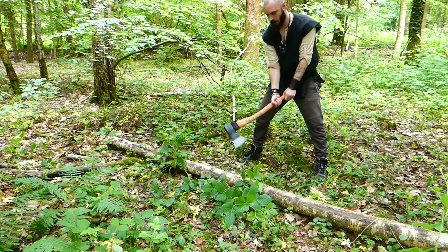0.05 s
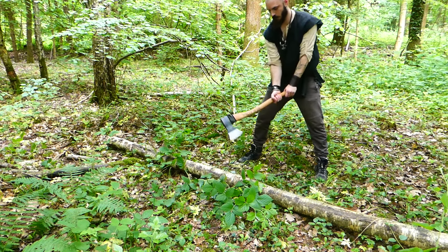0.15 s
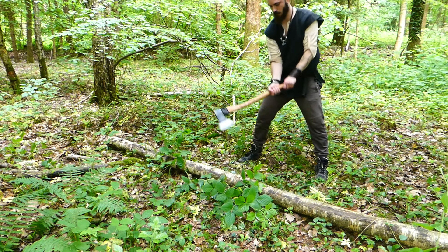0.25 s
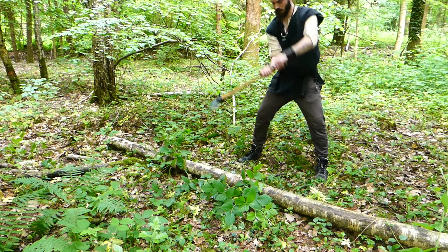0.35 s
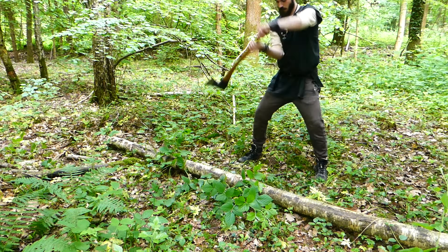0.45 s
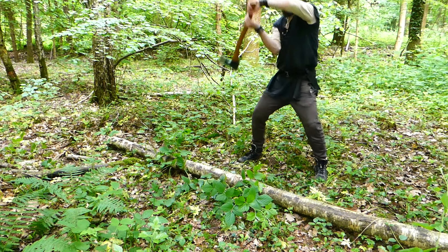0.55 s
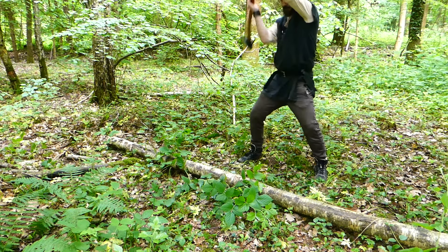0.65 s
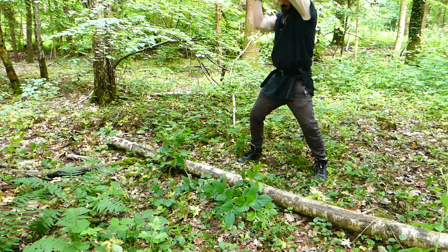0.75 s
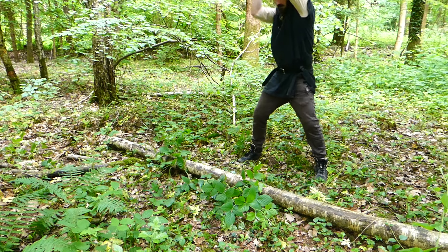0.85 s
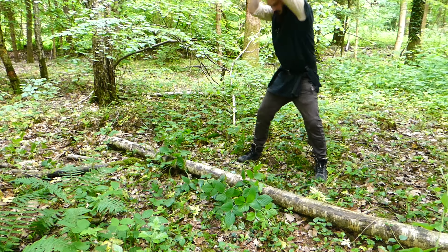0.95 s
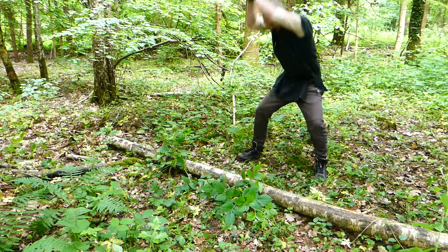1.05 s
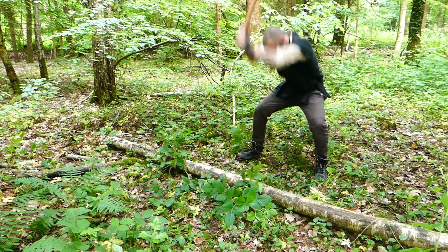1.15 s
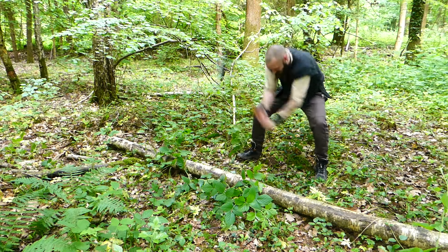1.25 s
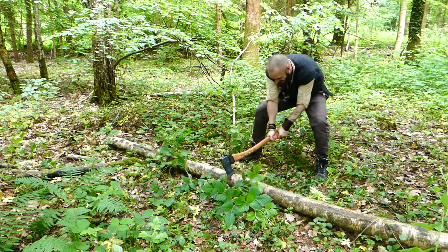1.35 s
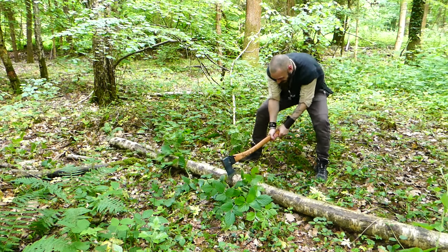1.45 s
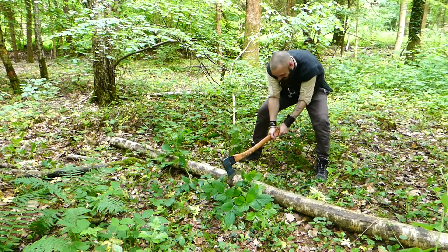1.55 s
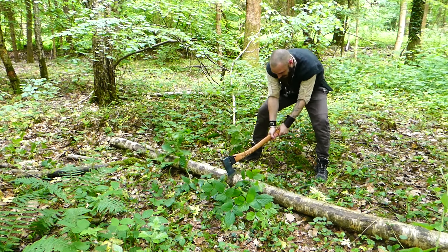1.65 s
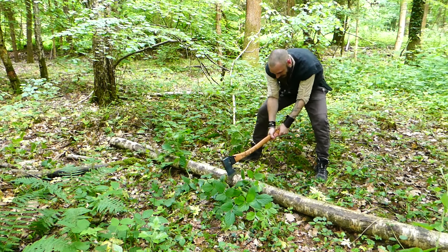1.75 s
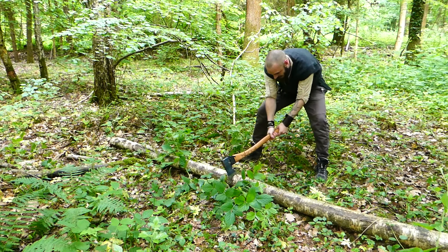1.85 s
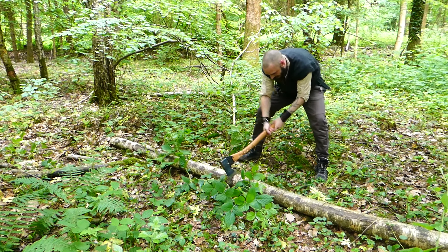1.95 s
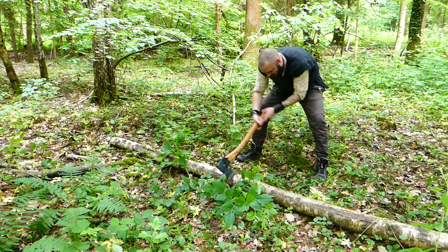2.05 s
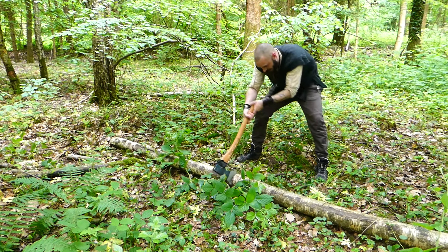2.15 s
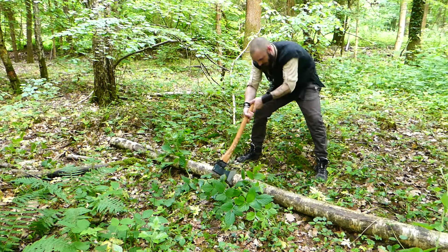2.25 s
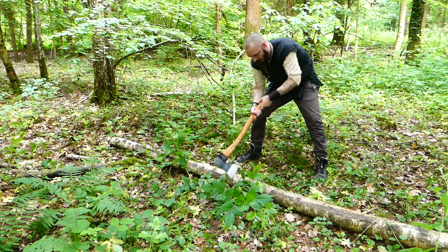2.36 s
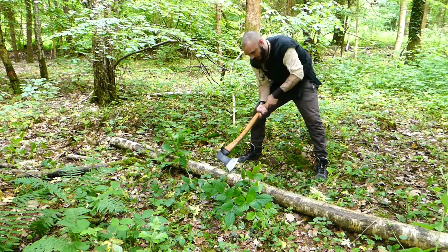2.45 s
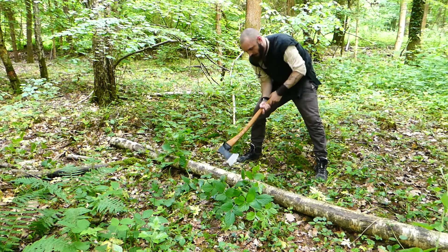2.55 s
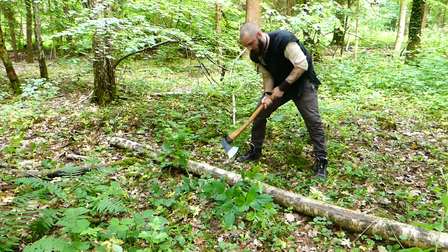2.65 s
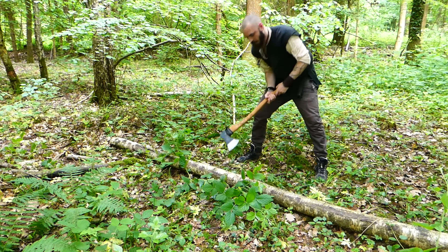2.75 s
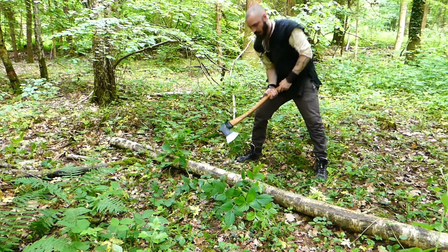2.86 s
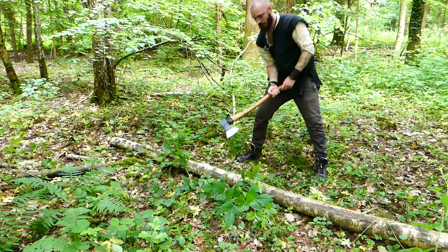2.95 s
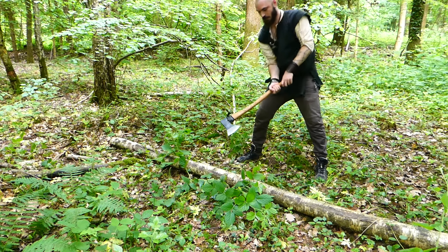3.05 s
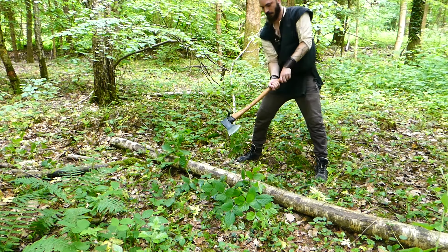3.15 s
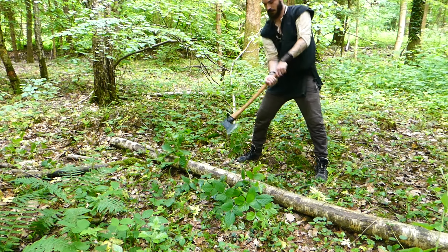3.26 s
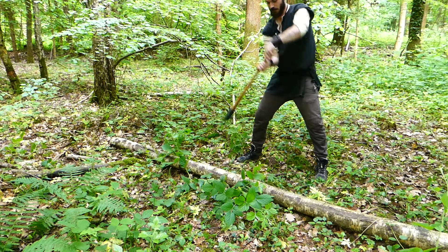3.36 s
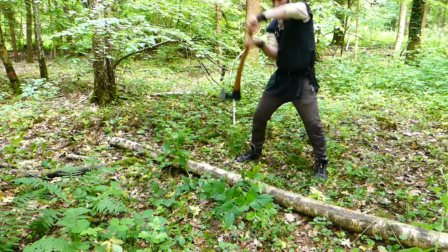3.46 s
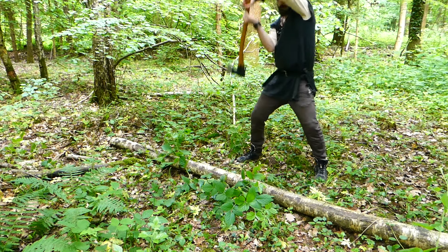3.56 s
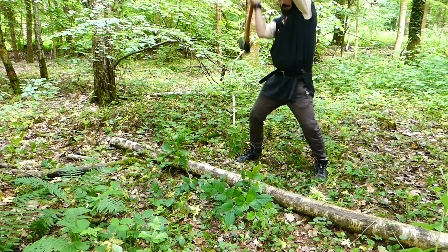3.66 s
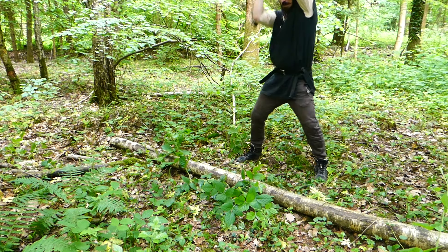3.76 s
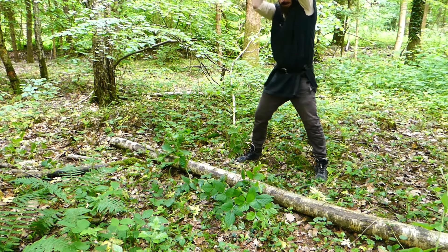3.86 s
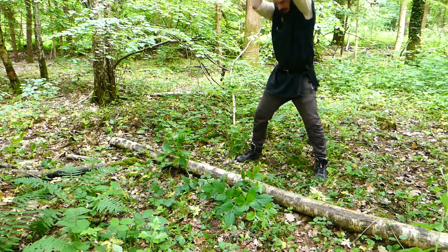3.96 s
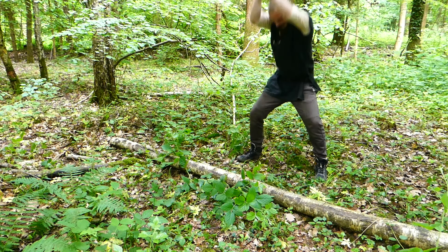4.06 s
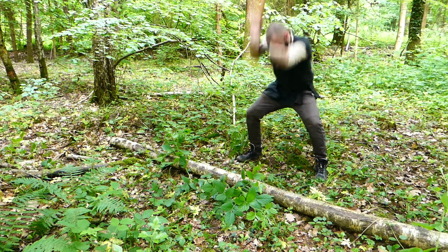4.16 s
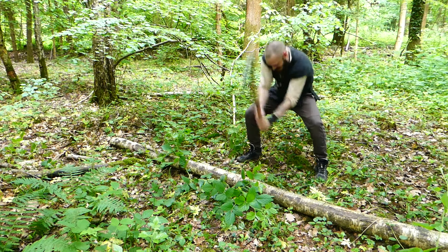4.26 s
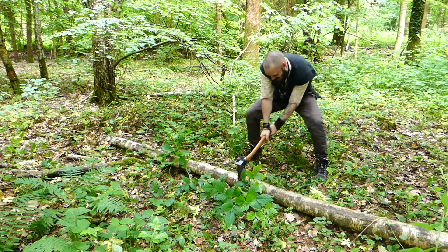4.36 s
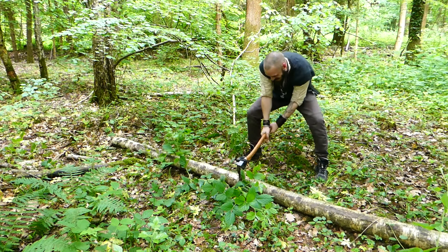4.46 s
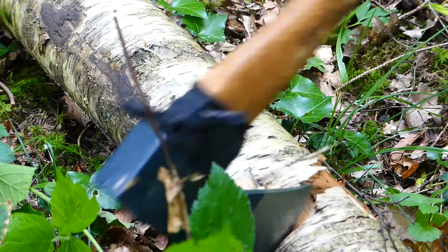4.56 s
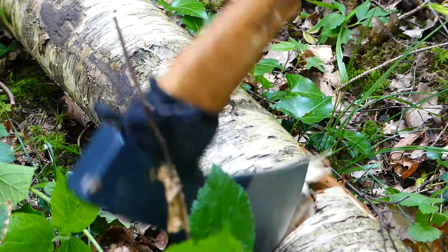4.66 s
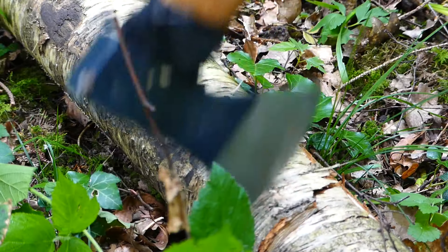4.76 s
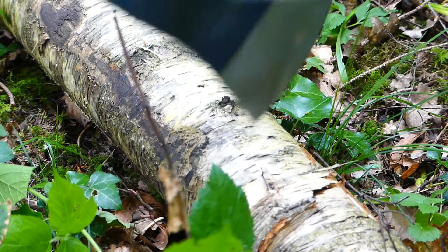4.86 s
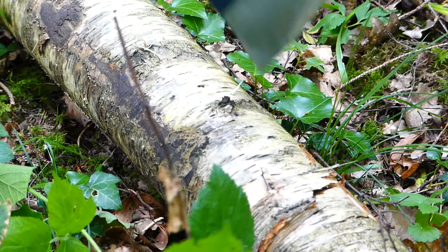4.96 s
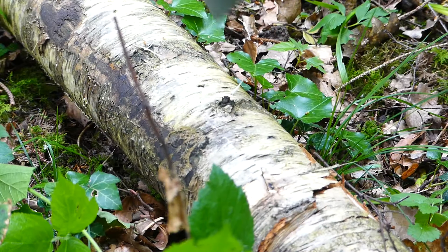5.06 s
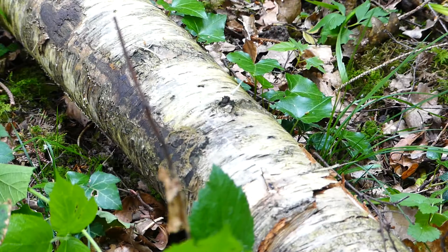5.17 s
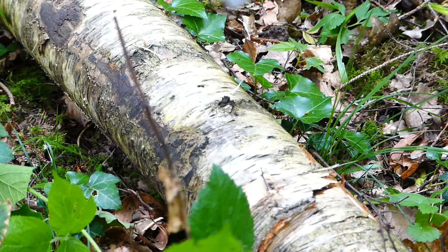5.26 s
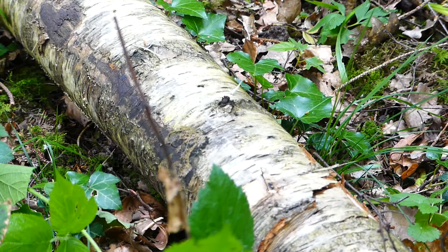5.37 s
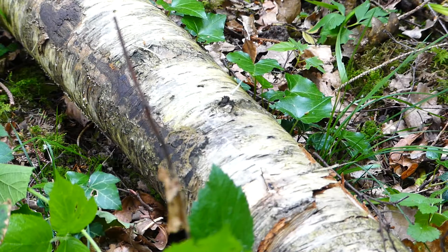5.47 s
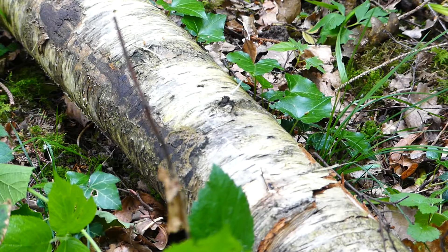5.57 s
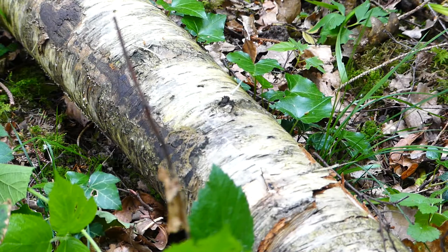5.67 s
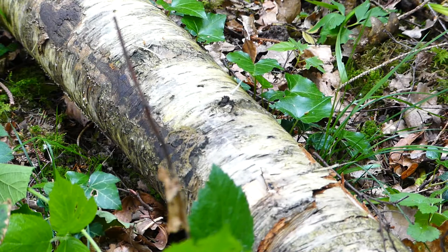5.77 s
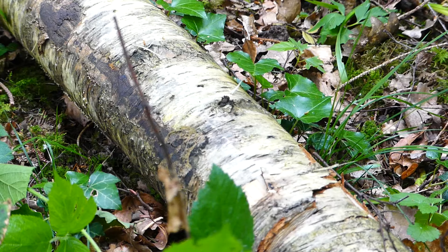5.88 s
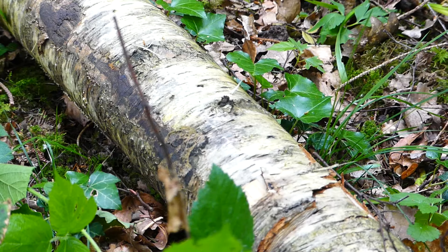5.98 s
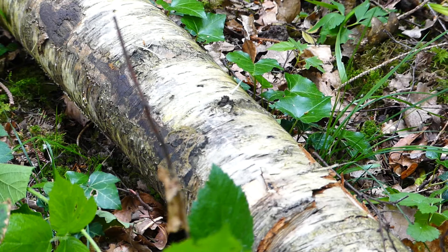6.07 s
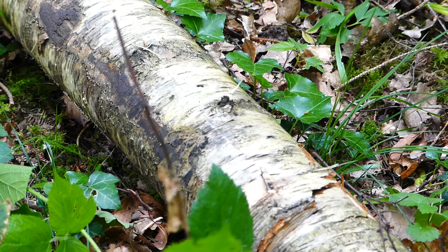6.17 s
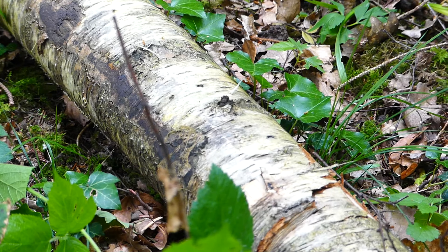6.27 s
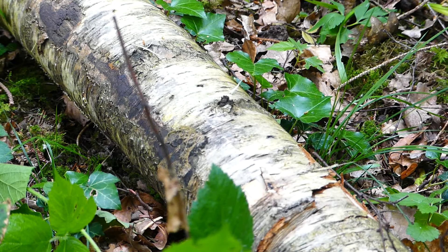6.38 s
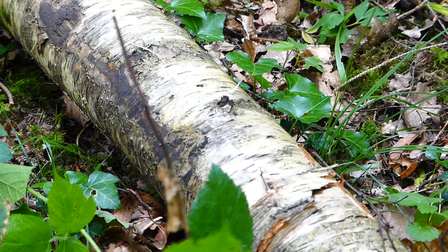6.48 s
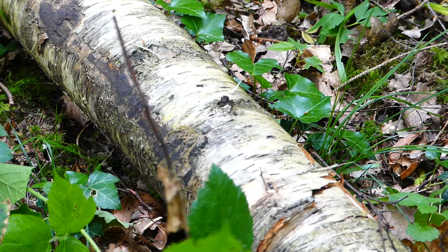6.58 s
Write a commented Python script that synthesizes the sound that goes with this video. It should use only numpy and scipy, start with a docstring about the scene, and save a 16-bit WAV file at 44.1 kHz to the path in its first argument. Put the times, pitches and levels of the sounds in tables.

```python
"""Chopping birch in the forest

An axe chops twice into a birch log on the forest floor, heard on a close pair of microphones. The log
rings and the trunks scatter each blow back. Birds whistle and trill in the trees; dry leaves rustle and
twigs snap under the woodcutter's feet. Just after the second blow the scene cuts to a spot beside the
log, where the leaves are closer and a songbird runs through its song."""
import sys
import numpy as np
from scipy import signal
from scipy.fft import rfft, irfft, next_fast_len
from scipy.io import wavfile
from scipy.ndimage import uniform_filter1d, minimum_filter1d

SR = 44100
rng = np.random.default_rng(int(sys.argv[2]) if len(sys.argv) > 2 else 0)


def generate_wav(sig):
    """Save sig (samples, or channels by samples) to the path in sys.argv[1] as 16-bit PCM at SR."""
    pcm = np.round(np.clip(np.atleast_2d(sig).T, -1, 1) * 32767).astype(np.int16)
    wavfile.write(sys.argv[1], SR, pcm)


N = 291942
TIME = np.arange(N) / SR
CUT_S = 4.556  # from the first microphone spot to the second

# Axe blows. Each row: start in seconds, thud in dB, crack in dB, crack centre in Hz, bark in dB,
# the bark's lead in seconds, echo in dB.
BLOWS = [(1.349, 0.5, -11.5, 3460, -20.5, 0.0032, -0.5), (4.3492, 1, -10.5, 3470, -30, 0.0022, -3.5)]
# Tone of the echo from the trunks. Each row: frequency in Hz, gain in dB.
ECHO_SPECTRUM = [(60, -17), (200, -14), (500, -9.5), (900, -9), (2000, -11.5), (4000, -11.5), (8000, -18.5),
                 (15000, -29)]


def axe(rise_s=0.0015, crack_t60=0.014, splinter_db=-18, splinter_t60=0.1, radiate_hz=135):
    """The edge tears the bark, cracks into the wood and sets the log ringing."""
    # Modes of the log. Each row: frequency in Hz, t60 in seconds, relative dB for blow one, for blow two.
    log_modes = [(149.5, 0.52, -31, -33), (177.4, 0.13, -20, -20.5), (235.8, 0.22, -20, -23.5),
                 (356, 0.083, -18, -33), (468.4, 0.079, -16, -10.5), (499, 0.051, -7, -5.5),
                 (573, 0.086, -20, -11), (608.6, 0.033, -3, 3), (769, 0.052, -9.5, -11.5),
                 (866, 0.031, -0.5, -19.5), (985, 0.09, -28, -27), (1142, 0.022, -6.5, -5),
                 (1278, 0.025, -16, -9.5), (1653, 0.024, -9.5, -13), (1772, 0.015, -6, -13),
                 (2138, .014, -13.5, -6.5), (2670, 0.01, -1, -10), (3540, 0.012, -12.5, -27)]
    out, t = np.zeros(N), np.arange(SR // 2) / SR
    hz, t60, *mode_db = np.transpose(log_modes)[:, :, None]
    modes = np.cos(2 * np.pi * hz * t) * gain_of(-60 * t / t60)
    modes *= 1 - np.exp(-t / rise_s)  # the force builds as the edge sinks in
    thin_log = signal.butter(4, radiate_hz, "high", fs=SR, output="sos")  # it radiates little bass
    for k, (s, thud_db, crack_db, crack_hz, bark_db, lead_s, _) in enumerate(BLOWS):
        thud = (gain_of(thud_db + mode_db[k]) * modes).sum(0)
        add(out, s, signal.sosfilt(thin_log, thud))
        add(out, s - lead_s, gain_of(bark_db) * burst(4400, 0.99, 0.014))
        add(out, s, gain_of(crack_db) * burst(crack_hz, 1.0, crack_t60))
        add(out, s + 0.0009, gain_of(crack_db) * burst(7100, 1.5, 0.011))  # the cheeks wedge the cut open
        add(out, s + 0.0035, gain_of(crack_db + splinter_db) * burst(4400, 2.1, splinter_t60))
    return out


def burst(hz, octaves, t60, size=8192):
    """Fibres breaking: a hump of noise that starts at once and dies away."""
    f, t = np.fft.rfftfreq(size, 1 / SR), np.arange(size) / SR
    hump = np.exp(-0.5 * (np.log2((f + 1) / hz) / octaves) ** 2)
    phases = np.exp(2j * np.pi * rng.random(len(f)))
    return unit_rms(irfft(hump * phases)) * gain_of(-60 * t / t60)


def axe_echo():
    """The log sends other modes in each direction, so the trunks return one smooth boom."""
    # Tone of the boom. Each row: frequency in Hz, gain in dB.
    boom_spectrum = [(50, -6), (200, 8), (450, 16), (650, 15.5), (950, 15.5), (1400, 6), (2800, 4),
                     (5000, 0), (9000, -3), (15000, -15)]
    kicks = np.zeros(N)
    for s, *_, echo_db in BLOWS:
        add(kicks, s, gain_of([echo_db]))
    return echo_at_spots(kicks, trunk_echo(boom_spectrum))


def near_songbird(sweep_hz=430):
    """Three runs and a buzzy flourish, close by; heard only from the second spot, already in mid-song."""
    # Three motifs. Each row is a note: delay in seconds, length in seconds, relative level in dB,
    # start and end pitch in Hz, glide time in seconds.
    opening = [(0, 0.029, -6.5, 3436, 2570, 0.0132), (.021, 0.023, -0.5, 3780, 3955, 0.0073),
               (.057, .02, -3, 5310, 4845, .0075)]
    tumble = [(-.009, 0.012, -8, 4700, 5850, .008), (0, .024, -0.5, 6190, 3350, .008),
              (.025, .019, -0.5, 4015, 4100, .005)]
    seesaw = [(-.045, 0.035, -2.5, 4508, 2650, .009), (-.012, 0.018, -7, 2700, 2250, 0.0078),
              (0, .027, -1, 2500, 3850, 0.00885)]
    # Closing buzzes. Each row: start and length in seconds, relative level in dB, centre in Hz.
    flourish = [(6.098, 0.079, -39, 5270), (6.326, 0.036, -32, 4210), (6.366, .039, -36.5, 3190),
                (6.414, 0.076, -34.5, 4600)]
    song = (phrase(opening, start_s=4.361, period_s=0.156, db=-33.5, sag=0.002, count=3)
            + phrase(tumble, start_s=4.831, period_s=0.114, db=-31.5, sag=0.0142, count=5)
            + phrase(seesaw, start_s=5.509, period_s=0.1267, db=-35.5, sag=0.0081, count=5))
    buzz = np.zeros(N)
    for s, length, db, centre_hz in flourish:
        add(buzz, s, gain_of(db) * trill(length, centre_hz, sweep_hz))
    canopy = echo(gain_of(-5.5) * song + gain_of(-1) * buzz, undergrowth(t60=0.35))
    far = echo(gain_of(8) * song + gain_of(7) * buzz, trunk_echo(ECHO_SPECTRUM))
    return (gain_of(-4) * song + canopy + far) * (TIME >= CUT_S)


def phrase(motif, start_s, period_s, db, sag, count):
    """A motif repeated evenly, its pitch sagging by a share each time; no two notes are quite alike."""
    out = np.zeros(N)
    for k in range(count):
        for delay, length, note_db, start_hz, end_hz, glide_s in motif:
            pitch = (1 - sag) ** k * (1 + 0.0052 * rng.uniform(-1.05, 1))
            note = whistle(length, pitch * start_hz, pitch * end_hz, glide_s, waver=0.013)
            level = gain_of(db + note_db + 1.5 * rng.uniform(-1, 1))
            add(out, start_s + k * period_s + delay, level * note)
    return out


def whistle(length, start_hz, end_hz, glide_s, upturn_hz=0, waver=0.0043):
    """A pure note that slides toward a pitch and may bend at the end."""
    t = np.arange(int(length * SR)) / SR
    wobble = smooth_noise(SR // 4, 120)[:len(t)]
    hz = end_hz + (start_hz - end_hz) * np.exp(-t / glide_s) + upturn_hz * (t / length) ** 4
    hz *= 1 + waver * wobble
    return signal.windows.tukey(len(t), 0.45) * np.sin(2 * np.pi * np.cumsum(hz) / SR)


def trill(length, centre_hz, sweep_hz, rate_hz=70, scatter=0.549, taper=0.57, pulsing=0.45):
    """A fast, uneven warble round one pitch, pulsing as it swells and fades."""
    count = int(length * SR)
    uneven = smooth_noise(2 * SR, 100)[:count]
    turn = 2 * np.pi * np.cumsum(rate_hz * (1 + 0.4 * uneven)) / SR
    hz = centre_hz + sweep_hz * (0.805 * np.sin(turn) + scatter * uneven)
    envelope = signal.windows.tukey(count, taper) * (1 + pulsing * np.cos(turn))
    return envelope * np.sin(2 * np.pi * np.cumsum(hz) / SR)


def leaves(grains_per_s=12000, spread_db=3, clump_db=1.33, lump_db=2, roundness=1.43):
    """Tiny crackles swell and ebb with each step; weight on the litter adds a lower, lumpier crunch."""
    # Steps, shifts of weight, and leaves shaken by a blow. Each row: peak time in seconds, level in dB, rise
    # and fall in seconds, # crunch against fizz in dB.
    rustles = [(1.12, -58, 0.19, 0.22, -9), (1.55, -56, .14, .1, -5), (1.67, -43.5, 0.04, .04, -5),
               (2.14, -56, 0.11, 0.2, -12), (2.37, -46.5, 0.034, 0.052, -13), (2.87, -55, 0.024, .025, -4),
               (4.536, -43, .05, 0.018, -6), (4.93, -47, .05, 0.092, -17), (5.04, -43, 0.054, 0.099, -14),
               (5.18, -41, 0.091, 0.072, -12.5), (5.39, -41, 0.068, 0.08, -6),
               (5.489, -36, 0.03, 0.1, -8.5), (5.669, -36, 0.038, 0.06, -8),
               (5.77, -42.5, 0.047, 0.051, -13), (6.23, -35, 0.063, 0.039, -12.5),
               (6.314, -34, 0.027, 0.056, -12.5)]
    # Tone of the fizz and of the crunch. Each row: frequency in Hz, relative level in dB.
    fizz_spectrum = [(60, -36), (500, -12), (1500, -10), (3000, -6), (5500, 0.5), (7500, -4.5), (10000, -1),
                     (14000, -4.5), (16000, -10)]
    crunch_spectrum = [(60, -26), (200, -15), (500, 1), (1000, 0.5), (2000, -4.5), (4000, -6.5),
                       (9000, -45)]
    clumps = gain_of(clump_db * smooth_noise(N, 400))
    lumps = unit_rms(gain_of(lump_db * smooth_noise(N, 700)))
    sizes = gain_of(spread_db * np.minimum(rng.exponential(1, (2, N)), 6)) * rng.choice([-1, 1], (2, N))
    grains = microphone_pair(sizes * (rng.random((2, N)) < grains_per_s / SR)) * clumps
    fizz = gain_of(np.where(TIME < CUT_S, -63.5, -53))  # a faint steady stir, closer at the second spot
    crunch = fizz * gain_of(-6)
    for s, db, rise, fall, crunch_db in rustles:
        from_peak = np.maximum((s - TIME) / rise, (TIME - s) / fall)
        swell = gain_of(db) * np.exp(-np.minimum(from_peak ** roundness, 20))
        fizz = np.hypot(fizz, swell)
        crunch = np.hypot(crunch, gain_of(crunch_db) * swell)
    return fizz * colour(grains, fizz_spectrum) + crunch * colour(grains * lumps, crunch_spectrum)


def twigs(octaves=0.85, t60=0.012, tick_db=-49, tick_range_db=6, tick_hz=6000, tick_count=14):
    """Single snaps and knocks underfoot, with faint ticks at random between them."""
    # Twigs snapping. Each row: start in seconds, level in dB, centre in Hz.
    snaps = [(.704, -39.5, 6900), (.811, -40.5, 3500), (1.657, -29, 5000), (2.074, -43.5, 4000),
             (2.142, -43, 8000), (2.48, -37.5, 2800), (2.858, -42, 2200), (3.104, -36.5, 9500),
             (4.29, -43, 8000), (4.4806, -29.5, 4340), (5.249, -31.5, 11000), (5.708, -32, 6870),
             (5.7848, -24, 5460), (5.8437, -36.5, 5900), (5.975, -37.5, 11000)]
    # Dull knocks of wood and boots. Each row: as for a snap, then width in octaves, t60 in seconds.
    knocks = [(2.25, -45, 423, 0.37, 0.13), (4.28, -39, 345, 0.17, 0.093), (4.605, -31, 1580, 0.22, 0.02),
              (5.786, -29, 613, 0.49, 0.018), (6.373, -37, 800, .72, 0.027)]
    out = np.zeros(N)
    for s, db, hz in snaps:
        add(out, s, gain_of(db) * burst(hz, octaves, t60))
    for s, db, *shape in knocks:
        add(out, s, gain_of(db) * burst(*shape))
    for when, strength, pitch in rng.random((tick_count, 3)):
        tick = burst(tick_hz * 2 ** (pitch - 0.5), octaves, t60)
        add(out, when * N / SR, gain_of(tick_db + tick_range_db * strength) * tick)
    return out


def bird_calls():
    """Single whistled calls from the trees around the microphones."""
    # Kinds of call. Each row: length in seconds, start over end pitch, glide in seconds, upturn in Hz.
    call_shapes = {"slur": (0.081, 1.55, .0075, 180), "rise": (.058, .88, .011, -40),
                   "drop": (0.039, 1.25, 0.03, -60), "pip": (0.0098, .99, 0.0072, 0),
                   "level": (.075, 1.03, .03, 0)}
    # Calls. Each row: start in seconds, kind, relative level in dB, end pitch in Hz before the upturn.
    calls = [(.16, "slur", -54, 5160), (.24, "level", -55, 4544), (.502, "slur", -49.5, 3910),
             (.553, "pip", -51.5, 8960), (.868, "slur", -50.5, 3860), (1.03, "level", -54, 4540),
             (2.4, "level", -53, 3810), (2.675, "rise", -47, 4264), (2.775, "drop", -51.5, 2700),
             (2.872, "rise", -48.5, 4220), (2.967, "drop", -53, 2686), (3.116, "pip", -43.5, 8930),
             (3.128, "rise", -48.5, 4400), (3.66, "drop", -55, 2840), (4.99, "drop", -38, 2730),
             (5.39, "drop", -38.5, 2640)]
    out = np.zeros(N)
    for s, kind, db, end_hz in calls:
        length, ratio, glide_s, upturn_hz = call_shapes[kind]
        add(out, s, gain_of(db) * whistle(length, ratio * end_hz, end_hz, glide_s, upturn_hz))
    return out


def far_birds():
    """Trills from deep in the wood."""
    # Each row: start and length in seconds, relative level in dB, centre and rough sweep in Hz.
    trills = [(0, 1.54, -55.5, 7170, 262), (0.051, 0.43, -57, 1985, 170), (.55, 0.74, -59, 2247, 199),
              (0.749, .65, -59, 7800, 250), (2.761, 0.47, -54.5, 2890, 230), (2.897, .35, -56, 4190, 330),
              (3.38, 0.18, -56.5, 7350, 160), (3.54, 0.25, -51.5, 6820, 241), (3.83, .22, -55, 2150, 100),
              (3.87, 0.49, -44, 3200, 295), (4.646, .045, -46, 1647, 90), (4.699, 0.55, -46.5, 3200, 158)]
    out = np.zeros(N)
    for s, length, db, centre_hz, sweep_hz in trills:
        add(out, s, gain_of(db) * trill(length, centre_hz, sweep_hz))
    return out


def undergrowth(t60, taps_per_s=3000):
    """Quick scatter from the ground and the plants close by."""
    t = np.arange(SR // 3) / SR
    taps = microphone_pair(rng.standard_normal((2, len(t))) * (rng.random((2, len(t))) < taps_per_s / SR))
    taps *= gain_of(-60 * t / t60) * (1 - np.exp(-t / 0.0013))
    return taps / np.linalg.norm(taps[0])


def trunk_echo(spectrum, hold_s=0.3):
    """Countless weak reflections hold level for a moment, then die away; the midrange lasts longest."""
    # Decay among the trunks. Each row: frequency in Hz, t60 in seconds.
    decay_times = [(100, 0.72), (600, 1.93), (3000, 1.9), (8000, 1.8), (15000, 1.1)]
    t = np.arange(3 * SR // 2) / SR
    taps = microphone_pair(rng.standard_normal((2, len(t))))
    hz, age, bands = signal.stft(taps * (1 - np.exp(-t / 0.048)), SR, nperseg=512)
    fade = gain_of(-60 * (np.hypot(age, hold_s) - hold_s) / curve_at(decay_times, hz)[:, None])
    fade *= gain_of(curve_at(spectrum, hz))[:, None] / np.sqrt(np.mean(fade ** 2, axis=1, keepdims=True))
    return signal.istft(bands * fade, SR, nperseg=512)[1] / np.linalg.norm(taps[0])


def air(patchy_db=2, body_db=-50, hiss_db=-53.65, murmur_hz=380, hiss_hz=1200):
    """The forest's low murmur swells and drifts in patches, under an even hiss."""
    # Tone of the air. Each row: frequency in Hz, relative level in dB.
    air_spectrum = [(15, -54), (25, -31), (64, -13), (141, 1.5), (545, 0), (607, 1.5), (677, -2),
                    (1610, -14.5), (3430, -13), (4140, -13), (6920, -18.5), (7710, -25), (10100, -19.5),
                    (14800, -28), (16000, -26)]
    # Course of the murmur. Each row: time in seconds, gain in dB.
    murmur = [(0, -48), (.7, -48), (1.1, -51.5), (2.35, -50.5), (2.85, -45), (3.15, -50.5), (6.62, -52)]
    noise = colour(microphone_pair(rng.standard_normal((2, N))), air_spectrum)
    hz, t, bands = signal.stft(noise, SR, nperseg=2048)
    patches = uniform_filter1d(rng.standard_normal(bands.shape[1:]), size=5, axis=0)
    patches = unit_rms(uniform_filter1d(patches, size=9, axis=1))
    low = 1 / (1 + (hz[:, None] / hiss_hz) ** 2)
    bass = 1 / (1 + (hz[:, None] / murmur_hz) ** 4)
    swell_db = bass * np.interp(t, *np.transpose(murmur)) + (1 - bass) * body_db + patchy_db * patches
    bands = bands * gain_of(low * swell_db + (1 - low) * hiss_db)
    return signal.istft(bands, SR, nperseg=2048)[1][:, :N]


def microphone_pair(x):
    """Turns two unrelated signals into what two close microphones hear of a diffuse field."""
    # Likeness of left and right. Each row: frequency in Hz, coherence from 0 to 1.
    coherence = [(30, 0.034), (600, 0.051), (1400, 0.31), (3000, 0.68), (7000, 0.84), (15000, 0.44)]
    count = x.shape[1]
    same = np.clip(curve_at(coherence, np.fft.rfftfreq(count, 1 / SR)), 0, 1)
    mid, side = rfft(x) * np.sqrt([(1 + same) / 2, (1 - same) / 2])
    return irfft(np.array([mid + side, mid - side]), count)


def place(x, balance):
    """Direct sound at the microphones. Each row of balance: frequency in Hz, left over right in dB."""
    count = next_fast_len(N, True)
    tilt_db = curve_at(balance, np.fft.rfftfreq(count, 1 / SR))
    return irfft(rfft(x, count) * gain_of([tilt_db / 2, -tilt_db / 2]), count)[:, :N]


def echo(x, response):
    """A sound's reflections at both microphones, cut to its length."""
    return signal.fftconvolve(x[None], response, axes=1)[:, :len(x)]


def echo_at_spots(x, response):
    """Echoes a sound at each microphone spot; nothing carries across the cut."""
    return np.hstack([echo(part, response) for part in np.split(x, [round(CUT_S * SR)])])


def colour(x, spectrum):
    """Gives a signal a spectrum, at rms 1."""
    count = next_fast_len(N, True)
    gains = gain_of(curve_at(spectrum, np.fft.rfftfreq(count, 1 / SR)))
    return unit_rms(irfft(rfft(x, count) * gains, count)[:, :N])


def curve_at(points, hz):
    """Reads a curve on a log-frequency axis."""
    f, value = np.transpose(points)
    return np.interp(np.log(hz + 1), np.log(f + 1), value)


def smooth_noise(count, span):
    """Noise averaged over span samples, at rms 1."""
    return unit_rms(uniform_filter1d(rng.standard_normal(count), size=span))


def unit_rms(x):
    """Scales to rms 1."""
    return x / np.sqrt(np.mean(x ** 2) + 1e-20)


def gain_of(db):
    """Decibels to a factor."""
    return 10 ** (np.asarray(db) / 20)


def add(mix, s, sound):
    """Adds a sound at s seconds."""
    part = mix[max(round(s * SR), 0):][:len(sound)]
    part += sound[:len(part)]


def scene():
    """Direct sounds, their echoes, the leaves and the air; far birds arrive only as scatter."""
    blows, calls, trills, snaps = axe(), bird_calls(), far_birds(), twigs()
    axe_balance = [(100, 0), (380, 0.8), (700, -1.5), (1100, -3.5), (2400, -2.5), (4400, 3.0)]
    direct = place(blows, axe_balance) + gain_of(-3.5) * calls + gain_of(-0.5) * snaps
    near = echo_at_spots(gain_of(-14) * blows + gain_of(-6) * snaps, undergrowth(t60=0.2))
    canopy = echo_at_spots(gain_of(-6) * calls + gain_of(-2.5) * trills, undergrowth(t60=0.29))
    to_trunks = gain_of(-9) * blows + gain_of(6) * calls + gain_of(7.5) * trills + gain_of(-14) * snaps
    far = echo_at_spots(to_trunks, trunk_echo(ECHO_SPECTRUM))
    return direct + near + canopy + far + axe_echo() + near_songbird() + leaves() + air()


def record(dry, ceiling=1.18, edge_hz=15900):
    """A fast limiter holds the two blows; a steep low-pass takes off the top treble."""
    allowed = np.minimum(ceiling / (abs(dry).max(0) + 1e-9), 1)
    limited = dry * uniform_filter1d(minimum_filter1d(allowed, size=70), size=70)
    low_pass = signal.firwin(255, edge_hz, window=("kaiser", 8), fs=SR)
    return signal.oaconvolve(limited, low_pass[None], "same")


dry = scene()
out = record(dry)
generate_wav(out)
```